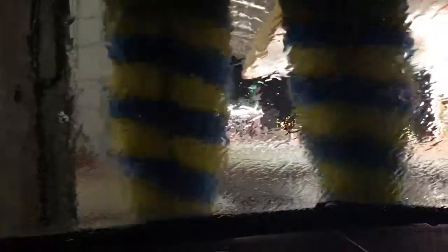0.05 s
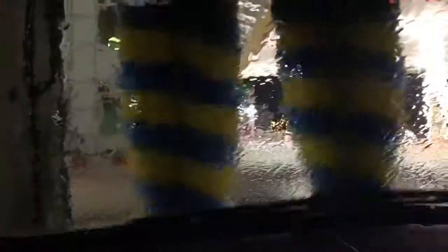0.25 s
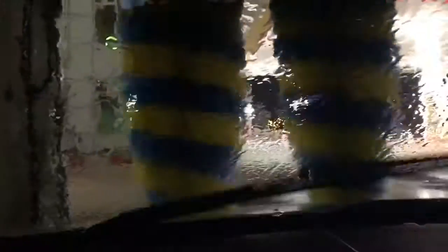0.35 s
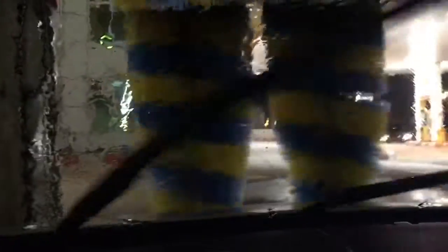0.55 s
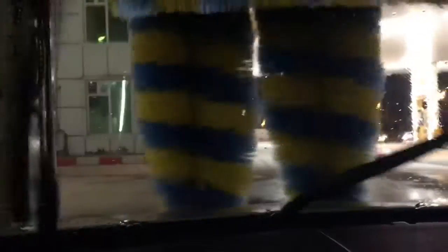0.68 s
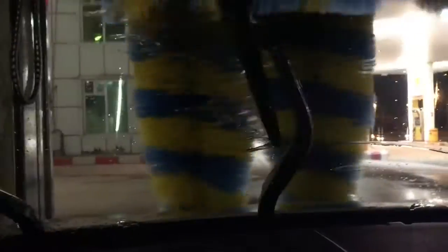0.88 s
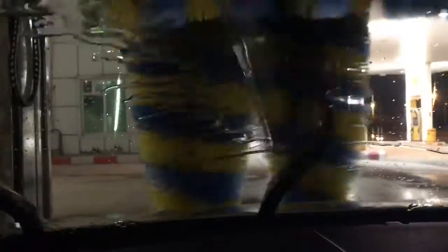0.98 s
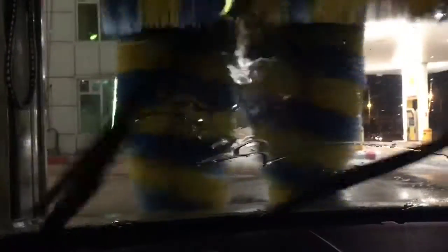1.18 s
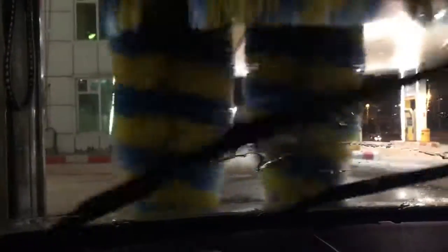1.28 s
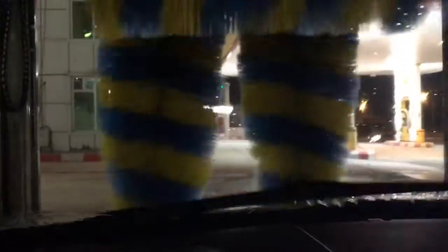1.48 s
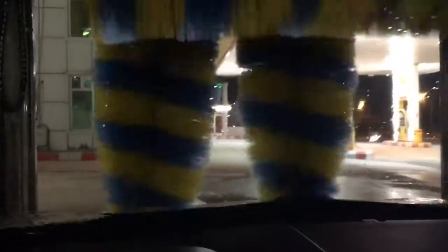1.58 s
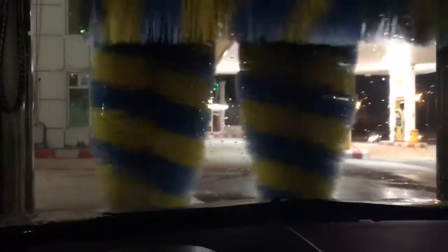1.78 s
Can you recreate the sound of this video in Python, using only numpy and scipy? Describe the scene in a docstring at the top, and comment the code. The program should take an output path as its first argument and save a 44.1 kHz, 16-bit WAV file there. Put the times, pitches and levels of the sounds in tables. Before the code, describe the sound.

From the front seat of a car in a car wash, wipers make one sweep: a click, a scuff, faint squeaks, then a thump as they turn back. Low machinery rumble and a soft water hiss continue throughout.

```python
"""Machinery rumbles and water hisses outside: you are sitting in a car in a car wash.
The wipers make one sweep. Their drive clicks in, and the blades scuff off their rest and rub up the
wet glass with a low drone and faint squeaks. At the top they flip over with a thump that rings the
windshield and the cabin, then they slide back while drops tick on the glass."""
import sys
import numpy as np
from scipy.fft import rfft, irfft, next_fast_len
from scipy.io import wavfile
from scipy.ndimage import map_coordinates

SR = 44100
rng = np.random.default_rng(int(sys.argv[2]) if len(sys.argv) > 2 else 0)


def wav_record(signal):
    """Record a signal, one row per channel, as 16-bit PCM in the file named by sys.argv[1]."""
    frames = np.transpose(np.atleast_2d(signal))
    bounded = np.clip(frames, -1, 1)
    # unit amplitude maps onto the largest positive 16-bit level
    quanta = np.round(bounded * 32767).astype(np.int16)
    wavfile.write(sys.argv[1], SR, quanta)


N = 81585


# The blade's spine snapping over. Each row: pitch in Hz, relative level in dB, fade time in seconds.
SNAP_TONES = [(1150, 0, .0055), (1800, -2, .003), (3000, -4, .003)]
# The blades slap the glass. Each row: start in seconds, clatter level in dB, clatter centre in Hz,
# thud level in dB, tick level in dB.
SLAPS = [(1.1008, -35, 960, -28.5, -47), (1.106, -40, 800, -44, -55), (1.1141, -42, 1100, -25, -63),
         (1.1242, -35.5, 2800, -36.5, -51), (1.1297, -32.5, 2570, -44.5, -70),
         (1.136, -39.5, 446, -23.5, -76), (1.1509, -36, 1190, -37.5, -69)]
# A dull clatter and a bright tick. Each row: frequency in Hz, relative level in dB.
CLATTER_COLOUR = [(200, -19), (500, 5), (800, 1.5), (1300, 0), (1800, -7.5), (2900, -8), (4000, -20),
                  (4800, -21), (6000, -25.5), (15500, -51)]
TICK_COLOUR = [(500, -19), (2000, -14), (6000, 7), (9000, 2), (15500, -1)]

def wiper_thump():
    """The blade snaps over; each slap ticks, clatters into the cabin and rings the car's body."""
    snap = through_glass(ring(start=1.1239, tones=SNAP_TONES))
    out = amp(-17) * snap
    for start, clatter_db, hz, thud_db, tick_db in SLAPS:
        clatter = boost_near(noise(CLATTER_COLOUR), hz, lift_db=7.5) * decay(start, fade_s=0.048)
        out += amp(clatter_db) * clatter + amp(thud_db) * thud(start)
        tick_shape = decay(start, fade_s=0.006) + amp(-12) * decay(start, fade_s=0.05)
        out += amp(tick_db) * noise(TICK_COLOUR) * tick_shape
    return out


# The windshield and cabin ringing. Each row: pitch in Hz, relative level in dB, fade time in seconds.
BODY_TONES = [(64.6, -2, 0.078), (92.9, 2.5, .13), (125.6, -1, 0.35), (172.3, -3.2, 0.19),
              (264.3, -4.5, .18), (357.6, -8.5, 0.19), (423.5, -8.5, 0.17), (504, -12.5, 0.088),
              (825, -15.5, 0.087), (992, -16, 0.12), (1080, -18, 0.068), (1345, -15.5, .07)]

def thud(start, rise_s=0.0031):
    """The windshield and cabin ring after a soft blow."""
    return ring(start, BODY_TONES) * ease_in(start, rise_s)


# Each row: start, rise, hold and release in seconds, pitch in Hz, level in dB.
DRONES = [(.199, 0.019, 0.085, 0.016, 128.2, -41), (.4, 0.031, 0.2, 0.077, 51.8, -49.5),
          (.418, 0.12, 0.055, .064, 80.8, -43.5), (.554, 0.09, 0.031, 0.021, 103, -41),
          (.63, .1, 0.2, 0.049, 42.26, -37.5), (1.1, 0.048, 0.037, 0.022, 39.4, -33),
          (1.19, 0.022, 0.035, 0.11, 39.03, -32)]

def wiper_drone(cutoff_hz=178):
    """The dragging wipers shake the glass; the lower the drone, the stronger its overtone."""
    out = np.zeros(N)
    for start, rise, hold, release, hz, db in DRONES:
        phase = 2 * np.pi * hz * since(start)
        overtone = amp(-7) * np.sin(3 * phase) / (1 + (3 * hz / cutoff_hz) ** 4)
        level = amp(db) * swell(start, rise, hold, release)
        out += level * np.sqrt(2) * (np.sin(phase) + overtone)
    return out


# Each row: start in seconds, rise in seconds, level in dB, fade time in seconds, centre in Hz.
SCUFFS = [(.329, 0.0072, -54, 0.075, 2010), (0.345, 0.0088, -46, .055, 7000),
          (0.3594, 0.0043, -38.5, 0.044, 3540), (0.369, 0.0044, -43, 0.06, 1110)]

def blade_scuffs():
    """The blades scrape briefly as they leave their rest."""
    out = np.zeros(N)
    for start, rise, db, fade_s, hz in SCUFFS:
        grip = np.clip(since(start) / rise, 0, 1)
        let_go = np.exp(-np.log(1000) * since(start + rise) / fade_s)
        out += amp(db) * grip * let_go * boost_near(rubber_rasp(), hz, lift_db=4.5)
    return out


# Where the blade rings. Each row: pitch in Hz, width in Hz, relative level in dB.
BLADE_PEAKS = [(1060, 35, 0), (1150, 40, -3), (1250, 70, -6), (2730, 40, -2), (3385, 40, -4.5),
               (3883, 73, -7), (6600, 110, -14)]
# The scraping noise. Each row: frequency in Hz, relative level in dB.
RASP_COLOUR = [(400, -3.5), (900, -16), (1080, -0.5), (1500, -1.5), (2200, -6.5), (2750, -8), (3800, -9.5),
               (4800, -18), (7000, -14.5), (15500, -28.5)]

def rubber_rasp():
    """Rubber grips unevenly, making a rough noise that sets the blade ringing."""
    peaks = lambda f: sum(amp(db) / (1 + 2j * (f - hz) / width) for hz, width, db in BLADE_PEAKS)
    ringing = unit(filtered(rng.standard_normal(N), peaks))
    scrape = noise(RASP_COLOUR) + amp(-1) * ringing
    return unit(scrape * amp(2.2 * wobble(700)))


# Each row: start in seconds, level in dB before the glass muffles it.
KNOCKS = [(0.1228, -52), (0.2126, -45), (0.2149, -38.5), (0.2232, -52), (.754, -50), (1.344, -50.5)]
# How a knock rings. Each row: pitch in Hz, relative level in dB, fade time in seconds.
LINKAGE_TONES = [(1356, -1.5, 0.015), (1634, 1.5, 0.012), (2010, -10, 0.029), (2650, -3.5, 0.0097)]

def linkage_knocks():
    """The rods that drive the wipers knock and ring behind the glass."""
    return through_glass(sum(amp(db) * ring(start, LINKAGE_TONES) for start, db in KNOCKS))


# Each row: start, rise, hold and release in seconds, pitch in Hz, how far below that pitch
# it starts (0.01 is 1%), level in dB.
SQUEALS = [(.355, .008, .018, .012, 1065, .01, -50), (.425, .015, .035, .025, 1335, .01, -61),
           (1.51, .045, .015, .025, 1110, .01, -60.5), (1.58, .03, .112, .018, 1115, .01, -60.5),
           (1.52, .025, .035, .03, 2400, .13, -64), (1.735, .012, .012, .01, 2370, .03, -64.5)]

def blade_squeals(settle_s=0.02, jitter=0.007, rough_db=2):
    """Rubber sticks and slips on the glass: rough tones that slide up to their pitch."""
    out = np.zeros(N)
    for start, rise, hold, release, hz, flat, db in SQUEALS:
        pitch = hz * (1 - flat * np.exp(-since(start) / settle_s) + jitter * wobble(150))
        level = amp(db + rough_db * wobble(90)) * swell(start, rise, hold, release)
        out += level * tone(pitch)
    return out


# Each row: start, rise, hold and release in seconds, level in dB.
SQUEAKS = [(0.147, 0.02, 0.019, 0.018, -58), (0.4, 0.041, 0.019, 0.055, -60.5),
           (0.848, 0.03, 0.022, 0.17, -59.5), (1.758, .03, 0.033, 0.044, -62)]
# Each row: frequency in Hz, relative level in dB.
SQUEAK_COLOUR = [(700, -1), (1100, -3.5), (1350, 3), (1550, -1.5), (2600, -17), (4000, -30.5)]

def rubber_squeaks():
    """The rubber grips the glass in faint, breathy squeaks."""
    level = sum(amp(db) * swell(*timing) for *timing, db in SQUEAKS)
    return noise(SQUEAK_COLOUR) * level


# Each row: frequency in Hz, relative level in dB.
RUB_COLOUR = [(800, -39), (2500, 6.5), (5000, -3), (7500, -10), (10000, -7.5), (13000, -6.5), (15500, -7.5)]
# Each row: time in seconds, level in dB.
RUB_LEVEL = [(0, -70), (.32, -71.5), (.38, -62.5), (.6, -65.5), (.85, -64.5), (1.03, -64.5), (1.07, -76),
             (1.25, -72), (1.46, -70.5), (1.6, -73), (1.85, -83)]

def rubber_hiss(flutter_db=1.7):
    """Rubber hisses as it slides over wet glass."""
    return noise(RUB_COLOUR) * amp(curve(RUB_LEVEL) + flutter_db * wobble(200))


# Each row: frequency in Hz, relative level in dB.
LIGHT_TICK_COLOUR = [(500, -14), (2500, 5), (6000, -3.5), (10000, -13), (15500, -7)]
# Each row: start in seconds, level in dB, centre in Hz, fade time in seconds.
LIGHT_TICKS = [(0.1204, -47.5, 8950, 0.014), (.188, -59.5, 4000, 0.11), (.2128, -58, 11000, .025),
               (.753, -59, 3460, .03), (1.1895, -62, 10100, .025), (1.2186, -56, 11000, 0.013),
               (1.257, -56, 6500, 0.016), (1.304, -62, 7000, .025), (1.329, -58.5, 8000, .025),
               (1.341, -62, 5500, 0.034), (1.401, -60, 5000, 0.039), (1.432, -57.5, 5000, 0.0246),
               (1.463, -57, 10000, .018), (1.484, -54.5, 4000, 0.043)]

def drops_and_drive_ticks():
    """Drops patter on the glass, and the wiper drive's knocks give bright ticks."""
    out = np.zeros(N)
    for start, db, hz, fade_s in LIGHT_TICKS:
        tick = boost_near(noise(LIGHT_TICK_COLOUR), hz, lift_db=10)
        out += amp(db) * tick * decay(start, fade_s) * ease_in(start, rise_s=0.00055)
    return out


# Each row: frequency in Hz, relative level in dB.
SPRAY_COLOUR = [(150, 1), (330, 11), (600, -3), (800, -0.5), (1150, 2), (1800, -3.5), (3300, -7.5),
                (4800, -17.5), (6500, -18.5), (9000, -21.5), (15500, -35.5)]

def water_spray(level_db=-58.5):
    """Spray hisses outside, heard through the glass."""
    return noise(SPRAY_COLOUR) * amp(level_db + 0.5 * wobble(11) + 0.8 * wobble(120))


# Each row: frequency in Hz, relative level in dB.
RUMBLE_COLOUR = [(15, -44), (28, 1.5), (48, -4), (85, -2), (125, -0.5), (200, -8.5), (300, -17), (420, -20),
                 (620, -25), (1000, -35.5), (2500, -75)]
# Each row: time in seconds, level in dB.
RUMBLE_LEVEL = [(0, -43), (.05, -40), (.11, -47.5), (.22, -41.5), (.275, -41), (.305, -46.5), (.345, -42),
                (.6, -40.5), (.8, -44), (1.05, -38), (1.3, -42.5), (1.4, -46), (1.49, -42.5),
                (1.585, -40.5), (1.65, -45.5), (1.73, -44), (1.85, -41.5)]
# Each row: start in seconds, end in seconds, pitch in Hz, level in dB.
MOTOR_HUMS = [(0, 1.85, 124.9, -57), (.3, 1.85, 79.7, -51), (1.32, 2.4, 214, -53)]
# Each row: start in seconds, level in dB.
BUMPS = [(.208, -41), (.255, -44.5), (.365, -47.5), (1.084, -37.5), (1.776, -40.5), (1.79, -42.5)]

def machinery(sway_db=1, waver_db=2, drift=0.0017, ramp_s=0.021):
    """Rumble, wavering motor hums and a few soft bumps come through the car's body."""
    out = noise(RUMBLE_COLOUR) * amp(curve(RUMBLE_LEVEL) + sway_db * wobble(14.66))
    for start, end, hz, db in MOTOR_HUMS:
        hum = np.sqrt(2) * tone(hz * (1 + drift * wobble(23)))
        running = swell(start, ramp_s, end - start - ramp_s, ramp_s)
        out += amp(db + waver_db * wobble(12.1)) * running * hum
    return out + sum(amp(db) * thud(start) for start, db in BUMPS)


def through_glass(x, low_hz=780, high_hz=2900):
    """The windshield lets mainly the middle pitches of a knock through."""
    bass_cut = lambda hz: (hz / low_hz) ** 3 / np.sqrt(1 + (hz / low_hz) ** 6)
    return filtered(x, lambda hz: bass_cut(hz) / np.sqrt(1 + (hz / high_hz) ** 6))


def amp(db):
    """Turn decibels into a number to multiply by."""
    return 10 ** (np.asarray(db) / 20)


def unit(x):
    """Scale a sound to an average strength (rms) of 1."""
    return x / np.sqrt(np.mean(x ** 2) + 1e-20)


def since(start):
    """Seconds since the start, zero before it."""
    return np.maximum(np.arange(N) / SR - start, 0)


def curve(rows):
    """Join (time, value) points with straight lines."""
    return np.interp(since(0), *np.transpose(rows))


def wobble(rate):
    """A smooth curve through `rate` random values a second."""
    return map_coordinates(rng.standard_normal(N // 8), [since(0) * rate + 2], mode="mirror")


def filtered(x, gain):
    """Turn each frequency up or down by gain(hz)."""
    size = next_fast_len(N + SR // 2)
    return irfft(rfft(x, size) * gain(np.fft.rfftfreq(size, 1 / SR)), size)[:N]


def noise(colour):
    """Noise of strength 1; its colour says how strong the lows and highs are."""
    freqs, db = np.transpose(colour)
    gain = lambda hz: amp(np.interp(np.log(hz + 1), np.log(freqs), db))
    return unit(filtered(rng.standard_normal(N), gain))


def boost_near(x, hz, lift_db):
    """Lift about an octave around the centre hz, then scale to strength 1."""
    return unit(filtered(x, lambda f: amp(lift_db * np.exp(-2 * np.log2((f + 1) / hz) ** 2))))


def decay(start, fade_s):
    """Jump to 1, then die away by 60 dB over the fade time."""
    t = since(start)
    return (t > 0) * np.exp(-np.log(1000) * t / fade_s)


def ease_in(start, rise_s):
    """Climb from 0 towards 1 to soften a sudden start."""
    return 1 - np.exp(-since(start) / rise_s)


def swell(start, rise, hold, release):
    """Rise to 1, stay there, then fall back to 0."""
    return np.clip(since(start) / rise, 0, 1) * np.clip(1 - since(start + rise + hold) / release, 0, 1)


def tone(hz):
    """A pure tone that follows a changing pitch."""
    return np.sin(2 * np.pi * np.cumsum(hz) / SR)


def ring(start, tones):
    """The fading tones of a struck object, their levels a little different every time."""
    return sum(amp(db + rng.normal()) * decay(start, fade_s) * np.sin(2 * np.pi * hz * since(start))
               for hz, db, fade_s in tones)


def scene():
    """Everything as heard from the front seat, in one channel."""
    background = machinery() + water_spray() + drops_and_drive_ticks()
    sweep = linkage_knocks() + blade_scuffs() + rubber_hiss() + rubber_squeaks() + blade_squeals()
    return (background + sweep + wiper_drone() + wiper_thump())[None]


def record(dry):
    """Soften the deepest bass and cut off the highest treble."""
    low_hz, top_hz = 33.2, 15950
    band = lambda hz: (hz < top_hz) * hz ** 6 / (hz ** 6 + low_hz ** 6)
    return np.array([filtered(x, band) for x in dry])


dry = scene()
out = record(dry)
wav_record(out)
```